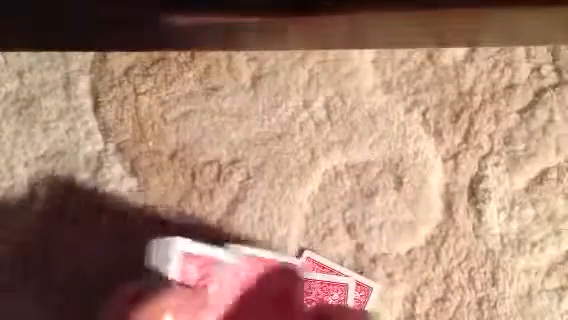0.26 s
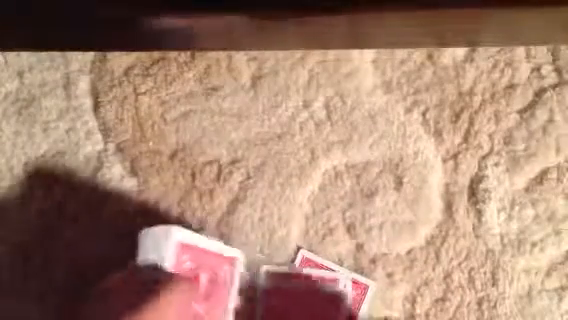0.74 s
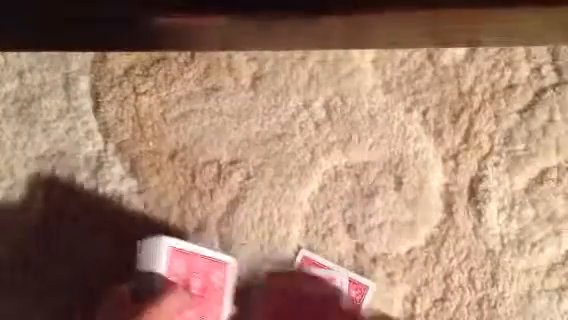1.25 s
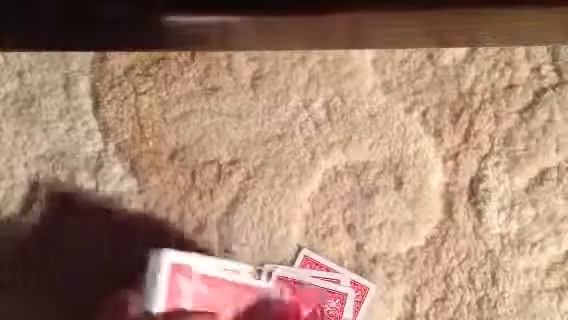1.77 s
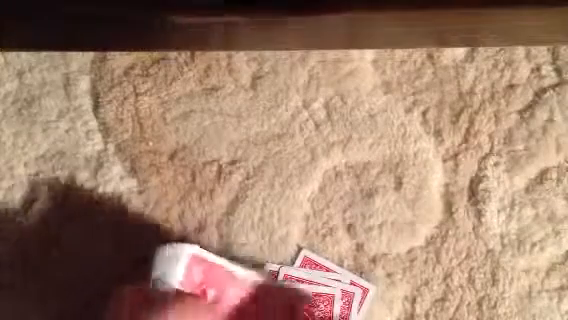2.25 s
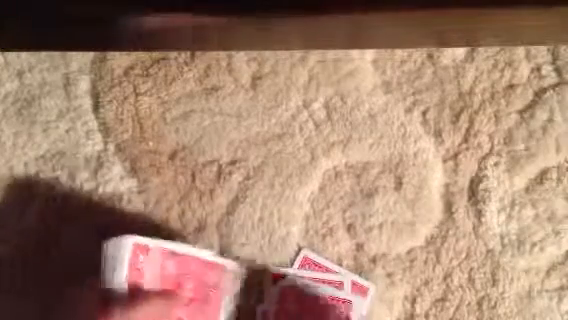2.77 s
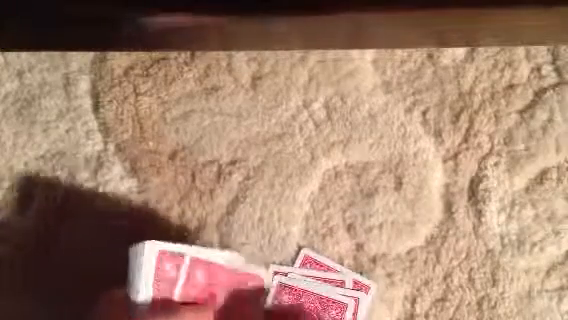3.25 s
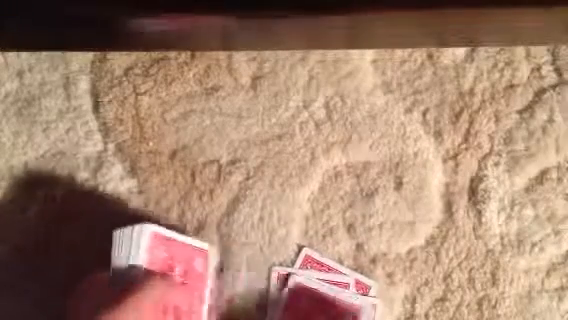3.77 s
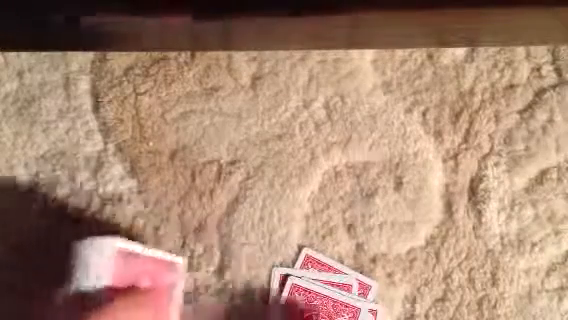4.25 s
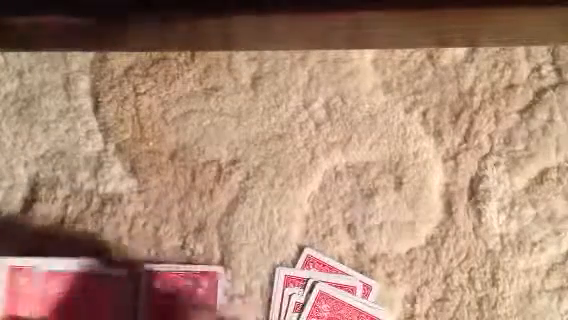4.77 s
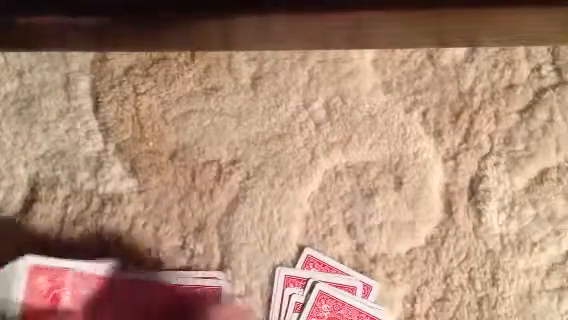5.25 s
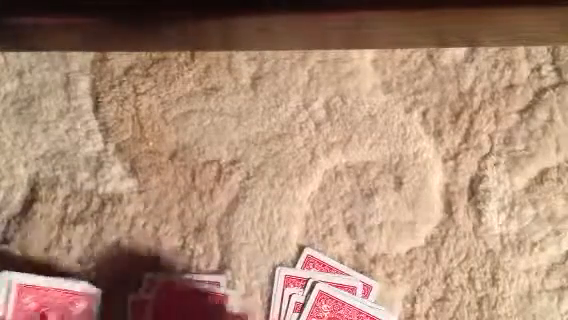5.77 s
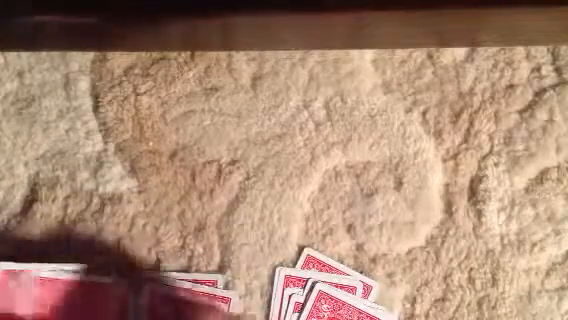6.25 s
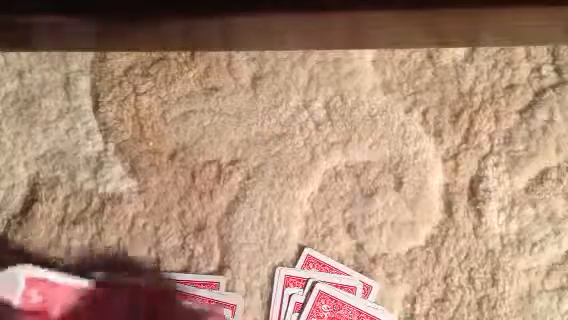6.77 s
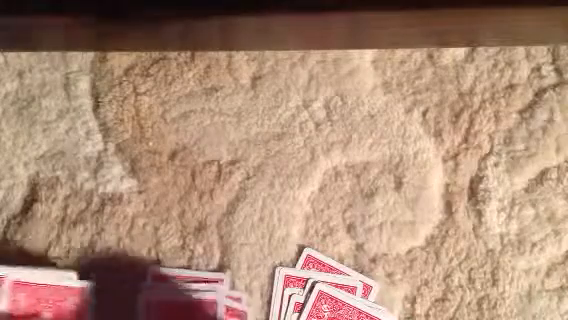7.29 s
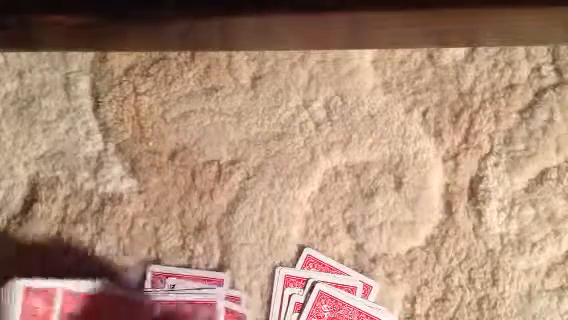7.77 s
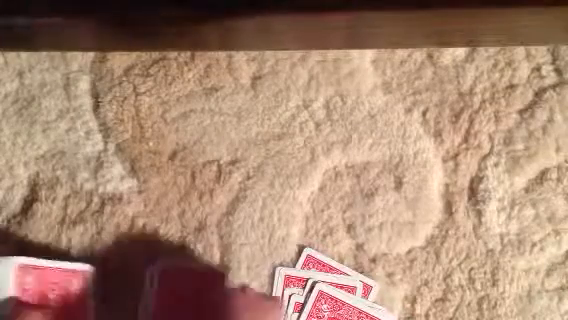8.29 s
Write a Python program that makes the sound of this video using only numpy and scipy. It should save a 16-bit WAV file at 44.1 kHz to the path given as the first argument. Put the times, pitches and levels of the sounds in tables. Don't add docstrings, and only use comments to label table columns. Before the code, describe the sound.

Playing cards dealt one by one from a hand-held deck, each a short papery scrape and crisp snap, in a small quiet room.

```python
import sys
import numpy as np
from scipy import signal
from scipy.fft import rfft, irfft, next_fast_len
from scipy.io import wavfile
from scipy.ndimage import uniform_filter1d, map_coordinates

SR = 44100
rng = np.random.default_rng(int(sys.argv[2]) if len(sys.argv) > 2 else 0)


def linear_from_db(decibels):
    return 10 ** (np.asarray(decibels, float) / 20)


def inscribe(sig):
    pcm = np.round(np.clip(np.atleast_2d(sig).T, -1, 1) * 32767)
    wavfile.write(sys.argv[1], SR, pcm.astype(np.int16))


N = 375732
SLOT, TAIL, LEAD = 2048, 20480, 64

# landing t/s, scrape level/dB, gap f/Hz, gap level/dB re scrape, thud level/dB
SLIDES = [(0.3638, -57, 1020, -9, -37.5), (0.7778, -54, 960, -13, -42), (1.297, -52, 1250, -19, -36.5),
          (1.6698, -47, 1280, -3.5, -38), (2.0085, -50, 1340, -2, -32), (2.3414, -51.5, 1240, 4, -39.5),
          (2.705, -47.5, 1250, -1, -42), (3.0716, -50.5, 970, -2.5, -37.5),
          (3.4183, -55.5, 1260, -9, -40.5), (3.788, -53.5, 635, -4, -39.5), (4.16, -48, 2380, -15, -40.5),
          (4.6506, -53.5, 2200, 0, -39.5), (4.9982, -50.5, 1700, -32, -32.5), (5.379, -54.5, 946, -24, -57),
          (5.76, -50.5, 650, -10, -35.5), (6.1526, -54, 2000, -1, -36), (6.4907, -51.5, 2280, -19, -35),
          (6.866, -51, 1570, -9, -50), (7.2218, -50, 1630, -7, -33.5), (7.5978, -49, 1550, -15, -31),
          (7.9726, -52, 2370, -1, -60), (8.322, -55.5, 2350, -13, -34)]
# t/s, level/dB, f/Hz
KNOCKS = [(0.413, -27.5, 685), (0.675, -35.5, 784), (0.753, -35, 643), (0.778, -18.5, 960),
          (0.931, -41, 328), (0.943, -45, 382), (0.973, -39, 360), (1.065, -39.5, 210), (1.075, -37, 395),
          (1.086, -57, 320), (1.201, -43, 660), (1.346, -29, 960), (1.922, -43, 680), (2.2605, -37.5, 640),
          (2.974, -40, 825), (3.317, -37.5, 417), (3.334, -46, 900), (3.469, -34.5, 394), (3.697, -40, 660),
          (4.212, -31, 780), (4.332, -45.5, 409), (4.91, -31, 725), (4.911, -42, 1270), (5.29, -49, 1400),
          (8.217, -38, 1340), (1.075, -36, 775), (6.0734, -49, 900), (4.939, -57, 304), (5.288, -38, 873),
          (6.403, -46, 890), (6.781, -44.5, 990), (6.904, -26, 687), (7.222, -25.5, 960), (7.291, -46, 370),
          (7.863, -44.5, 674), (8.2165, -38, 810)]


def unit(x):
    return x / np.sqrt(np.mean(x ** 2) + 1e-20)


def along(points, hz):
    f, v = np.transpose(points)
    return np.interp(np.log(hz + 1), np.log(f + 1), v)


def wobble(rate):
    knots = rng.standard_normal(int(N * rate / SR) + 4)
    return map_coordinates(knots, [np.arange(N) * rate / SR])


def resonance(f, hz, width_hz):
    return 1j * f * width_hz / (hz * hz - f * f + 1j * f * width_hz)


def rush(spectrum, patchy_db):
    z = signal.stft(rng.standard_normal(N), nperseg=256)[2]
    field = uniform_filter1d(rng.standard_normal(z.shape), size=4, axis=0)
    field = uniform_filter1d(field, size=8, axis=1)
    patchy = signal.istft(z * linear_from_db(patchy_db * unit(field)), nperseg=256)[1]
    m = next_fast_len(len(patchy))
    colour = linear_from_db(along(spectrum, np.fft.rfftfreq(m, 1 / SR)))
    return unit(irfft(rfft(patchy, m) * colour, m)[:N])


def slips(spectrum, patchy_db):
    unevenness = linear_from_db(3 * wobble(400) + 1.2 * wobble(60))
    return unit(unevenness * rush(spectrum, patchy_db))


def laid_out(rows, times):
    index = np.round(times * SR).astype(int)[:, None] - LEAD + np.arange(rows.shape[1])
    return np.bincount(index.ravel(), rows.ravel(), N + rows.shape[1])[:N]


def background():
    # f/Hz, level/dB
    hiss_spectrum = [(20, -25), (65, -22), (95, -12), (170, 1.5), (400, 0), (1400, -9), (3000, -10.5),
                     (5400, -14), (9000, -15), (15000, -18)]
    # f/Hz, rms level/dB
    hum = (119.8, -73)
    hum_hz, hum_db = hum
    phase = 2 * np.pi * np.cumsum(hum_hz + 0.94 * wobble(7.2)) / SR
    hiss = linear_from_db(-65) * rush(hiss_spectrum, patchy_db=.6)
    return hiss + linear_from_db(hum_db + 1.3 * wobble(4.3)) * np.sqrt(2) * np.sin(phase)


def rubbing():
    # f/Hz, level/dB per Hz
    palm = [(500, -39), (1200, 4), (2000, 6), (3000, 3), (4500, 3), (7000, -2.5), (12000, -16)]
    # f/Hz, level/dB per Hz
    rug_spectrum = [(90, -32.5), (180, 10), (350, 9.5), (700, 8), (1200, 3.5), (2500, -33)]
    # t/s, level/dB
    still = (0.18, -87)
    # t/s, level/dB
    hands = [(.36, -73), (.55, -79.5), (.95, -81), (1.301, -81), (1.55, -87.5), (2.2, -82.5), (2.55, -83.5),
             (2.85, -92), (3.301, -90.5), (4.2, -96), (4.45, -83), (4.9, -91), (5.6, -91), (6.401, -88),
             (6.7, -92), (7.4, -87.5), (8.25, -87), (8.45, -90)]
    scrape_db, rug_db = 19.5, 18
    settle_db, settle_s = -13, 0.062
    s, busy_db = np.transpose([still, *hands])
    t = np.arange(N) / SR
    rug = unit(linear_from_db(2.5 * wobble(60)) * rush(rug_spectrum, patchy_db=2.2))
    busy = linear_from_db(np.interp(t, s, busy_db) + 1.5 * wobble(5.4))
    settle = sum(linear_from_db(db + settle_db) * np.exp(-np.abs(t - at) / settle_s) for at, db, *_ in SLIDES)
    skin = linear_from_db(scrape_db) * busy * slips(palm, patchy_db=1.5)
    return skin + (linear_from_db(rug_db) * busy + settle) * rug


def burst(length, response, fall):
    spike = 3.7
    u = (np.arange(SLOT) - LEAD) / SR / length
    shape = np.clip(3 * u + .5, 0, 1) ** 3.3 * (u > 0) * linear_from_db(-fall * np.clip(u - .7, 0, None))
    first = np.arange(SLOT) == LEAD + np.round(0.4 * length * SR)
    grains = rng.standard_normal(u.shape) * linear_from_db(5.96 * rng.standard_normal(u.shape))
    force = rfft(shape * grains - spike * first)
    force = force / np.sqrt(np.abs(uniform_filter1d(np.abs(force) ** 2, size=36, axis=1)))
    rows = irfft(force * response(np.fft.rfftfreq(SLOT, 1 / SR)), SLOT)
    rows = rows * (np.arange(SLOT) < SLOT // 2)
    power = np.abs(uniform_filter1d(rows ** 2, size=60, axis=1))
    return rows / np.sqrt(power.max(axis=1, keepdims=True))


def contacts(table):
    # f/Hz, width/Hz, level/dB
    pile = [
        (345, 68, 3.5),
        (620, 104, 2),
        (1020, 600, -4),
    ]
    _, db, hz, pat_db, crack_db, ms = np.transpose(table)[:, :, None]
    length = ms / 1000

    def card(f):
        deck = 0.061 * resonance(f, 3890, 3900) ** 2 - 0.56 * resonance(f, 2308, 330)
        return resonance(f, hz, 0.12 * hz) + deck

    def edge(f):
        return resonance(f, 6750, 3100) * resonance(f, 3500, 7000) * resonance(f, 6000, 11000)

    def air(f):
        modes = sum((-1) ** k * linear_from_db(g) * resonance(f, c, w) for k, (c, w, g) in enumerate(pile))
        return modes * resonance(f, 550, 6900)

    ring = burst(length, card, fall=12.0)
    crack = burst(length, edge, fall=76)
    pat = burst(0.83 * length, air, fall=12.0)
    return linear_from_db(db - 5.5) * (ring + linear_from_db(crack_db - 4.0) * crack + linear_from_db(pat_db + 1.0) * pat)


def catches():
    # t/s, ring level/dB, ring f/Hz, crack level/dB re ring
    caught = [(0.2214, -47, 5500, 3), (4.9111, -46, 3050, -3), (2.4607, -46, 2400, -12),
              (2.4645, -43, 1640, -6), (2.4925, -39, 3700, -12), (2.498, -46, 3000, -10),
              (2.5604, -41, 4240, -22), (1.659, -38, 5600, -10), (8.217, -46, 4400, -2),
              (5.8065, -42, 3800, -15), (2.5645, -42, 4300, -3), (2.5695, -47, 4000, 0),
              (2.6215, -48, 5200, 0), (1.2215, -47, 2600, 0), (4.0506, -54, 4400, 0),
              (4.1079, -50, 4000, 0), (5.3207, -50, 4000, 0), (6.1134, -53, 3000, 0)]
    pat_db, ms = -11, 1.6
    return [(s, db, hz, pat_db, crack, ms) for s, db, hz, crack in caught]


def slides():
    # f/Hz, level/dB per Hz
    scrape_spectrum = [(500, -43.5), (1200, 2.5), (2500, 6.5), (4500, 7.5), (7000, 6), (11000, -2.5),
                       (16000, -71)]
    pushes = [66, 85, 56.4, 67, 62, 59.6, 80, 72, 75.7, 75, 64.6, 45, 52.5, 112, 64.5, 60.4, 58.3, 60, 45.6,
              47.7, 62, 72]
    lull, lull_s = 0.25, 0.008
    t = np.arange(N) / SR
    scrape = slips(scrape_spectrum, patchy_db=1.6)
    out = np.zeros(N)
    f = np.fft.rfftfreq(TAIL, 1 / SR)
    grit = unit(linear_from_db(4 * wobble(150)))
    for (s, db, hz, gap_db, thud_db), push_ms in zip(SLIDES, pushes):
        at = slice(round(s * SR) - TAIL // 2, min(N, round(s * SR) + TAIL // 2))
        u = t[at] - s
        push = np.sin(np.pi / 2 * np.clip(1.19 + 950 * u / push_ms, 0, 1)) ** 2.5
        speed = np.where(u < 0, push, np.exp(-u / 0.062))
        speed = speed * (1 - lull * np.exp(-(u / lull_s + 1) ** 2))
        cavity = resonance(f, hz, 0.54 * hz) * resonance(f, hz, 1500)
        gap = unit(irfft(rfft(rng.standard_normal(TAIL)) * cavity, TAIL))
        rubbed = scrape[at] + linear_from_db(gap_db - 2.0) * gap[:len(u)] * grit[at]
        late = np.clip(u - .003, 0, None) / 0.0051
        thud = late * np.exp(1 - late) * np.sin(2 * np.pi * rng.uniform(187.0, 209.4) * u)
        out[at] += linear_from_db(db) * speed * rubbed + linear_from_db(thud_db - 6.0) * thud
    return out


def corners():
    # t/s, ring level/dB, ring f/Hz, pat level/dB re ring, crack level/dB re ring
    touched = [(0.361, -30.5, 3170, 2.5, 9), (0.7772, -21, 6300, -14, -20), (1.293, -35.5, 3200, 4, 6),
               (1.671, -14.5, 4620, -14, -5), (2.0084, -22.5, 5070, -5.5, -23),
               (2.3406, -23, 4570, -4.5, -0.5), (2.7039, -23, 5000, -2, 4), (3.0705, -24.5, 4150, -7, -1.5),
               (3.4168, -32.5, 4300, -3.5, -7), (3.789, -40, 4400, 7, 11.5), (4.1601, -21.5, 3970, -7, -7),
               (4.6501, -36.5, 1670, 6.5, 4), (4.9934, -39.5, 6700, 0, 7), (5.3814, -29, 4840, -1.5, 2),
               (5.7567, -31.5, 2750, -7, -4), (6.1523, -22, 3060, -4.5, -6), (6.488, -35.5, 6220, 2, -4),
               (6.8662, -25.5, 5000, -1.5, 1), (7.223, -45, 7260, -9, 22), (7.597, -28, 5160, -7.5, 5.5),
               (7.9736, -30.5, 3170, -3, 13.5), (8.3218, -35.5, 4800, -9, 5)]
    return [(*row, 2.8) for row in touched]


def snaps():
    # t/s, ring level/dB, ring f/Hz, pat level/dB re ring, crack level/dB re ring
    landed = [(0.3665, -31.5, 2400, -1.5, -15), (0.7838, -17.5, 4230, -18, -30),
              (0.785, -19.5, 3130, -15.5, -25), (1.3043, -28.5, 3000, -6.5, 1.5),
              (1.2971, -35.5, 3200, 1, -3), (1.6762, -10.5, 4500, -25, -16), (1.678, -8.5, 2990, -35, 2.5),
              (1.6784, -14, 2530, -28, -4), (2.014, -20.5, 3130, -6, 8), (2.3494, -26.5, 2900, -6, 3),
              (2.7124, -17.5, 2550, -26, -20), (3.076, -23, 5540, -2, -37), (3.4247, -30, 2370, -2.5, 4),
              (3.7936, -30, 2450, -13, -7), (4.167, -24.5, 2430, -12.5, -10), (5, -28, 4900, -1.5, -38),
              (5.0043, -26, 2305, -4.5, -27), (5.0055, -27.5, 3820, -15, -20),
              (5.386, -21.5, 3900, -4, 3.5), (5.767, -25, 4660, -4.5, 1), (6.1583, -25.5, 2230, -0.5, 6),
              (6.494, -31, 4800, -12, -18.5), (6.8712, -15, 8250, -32, 5), (7.2253, -23.5, 5800, -5.5, -14),
              (7.2293, -17.5, 4880, -26, 2.5), (7.6006, -21, 4000, -27, -3), (7.605, -27, 2400, -15, -20),
              (7.9757, -23.5, 2325, -5.5, 2.5), (8.3277, -31, 2550, -8, -6)]
    return [(*row, 1.5) for row in landed]


def flaps():
    # t/s, ring level/dB, ring f/Hz, crack level/dB re ring
    flapped = [(0.412, -34, 5500, 9.5), (0.457, -38, 960, -20), (0.8167, -35.5, 2580, 2.5),
               (0.7729, -37, 6200, -10), (2.0464, -35, 5000, 0), (3.469, -42, 5200, 0),
               (0.8144, -34, 7000, 3), (1.3473, -29.5, 2370, 6.5), (1.6889, -30.5, 3140, -13),
               (2.0493, -27.5, 7160, 7.5), (2.376, -42.5, 7000, -1), (2.757, -32.5, 8000, 11),
               (3.107, -48.5, 1470, 17), (3.4331, -31.5, 2400, 6), (3.4455, -40.5, 2580, 12),
               (3.4722, -34.5, 5070, 5.5), (3.8347, -31, 5300, 3), (4.209, -40, 7500, 4),
               (4.2125, -34, 6400, 5), (4.177, -35.5, 3900, -8), (6.195, -36, 7000, 4),
               (5.4138, -30, 4450, 5), (6.1973, -31, 2270, 5), (6.5013, -31, 2520, -2),
               (6.5181, -37, 4750, 5), (6.5508, -40.5, 4800, 1.5), (6.8822, -27, 3550, -26),
               (7.2625, -36, 3580, -12), (7.6491, -33, 4600, -1), (7.9864, -30.5, 1830, -16),
               (8.006, -29.5, 4500, -16), (8.353, -43, 2500, -10), (8.3756, -39, 3280, -17),
               (8.379, -37.5, 4900, -2)]
    pat_db, ms = -2.5, 1.9
    return [(s, db, hz, pat_db, crack, ms) for s, db, hz, crack in flapped]


def knocks():
    decay_cycles, level_db = 1, -5.5
    _, db, hz = np.transpose(KNOCKS)[:, :, None]
    cycles = hz * np.clip(np.arange(SLOT) - LEAD, 0, None) / SR
    u = cycles / decay_cycles
    return linear_from_db(db + level_db) * u * np.exp(1 - u) * np.sin(2 * np.pi * cycles)


def taps():
    # t/s, ring level/dB, ring f/Hz, crack level/dB re ring
    tapped = [(0.669, -43.5, 4260, 1), (0.675, -51.5, 5370, 16.5), (0.929, -44.5, 3120, 4),
              (0.9419, -39.5, 4230, -11), (1.139, -43, 3630, 6), (1.1989, -38.5, 5100, -16),
              (1.521, -42.5, 3780, -48), (1.9165, -45, 4260, 1), (2.254, -49, 4250, 2),
              (2.9671, -51, 6300, 6), (3.3138, -42, 5930, -7), (3.694, -46, 4870, -8),
              (4.063, -42.5, 5030, 4), (5.2812, -44, 6050, -15), (5.346, -38.5, 4700, -8),
              (5.749, -58, 4700, 1), (6.038, -56, 5060, 10), (6.1325, -39, 2340, 3), (6.408, -56, 2280, 7),
              (6.766, -48.5, 4520, 5), (6.781, -51, 4330, -15.5), (6.848, -53, 1600, -16),
              (7.4883, -53, 6100, 1), (7.862, -51, 4930, 4), (7.946, -41.5, 5030, 9), (8.21, -55, 4750, -6)]
    pat_db, ms = -4, 3
    return [(s, db, hz, pat_db, crack, ms) for s, db, hz, crack in tapped]


def pats():
    # t/s, dull ring level/dB, pat level/dB re ring, crack level/dB re ring
    patted = [(0.7516, -43.5, 8, 4), (0.971, -56.5, 3, 17.5), (1.072, -56, 16.5, 13), (1.223, -63, 5, 18),
              (1.561, -49, 2.5, 3), (1.924, -63, 16, 13), (2.259, -65, 16, -8.5), (2.621, -58, 14, -13),
              (2.9754, -53, 10, 9), (3.282, -56, 6, 3), (3.334, -66, 10, -7), (3.6979, -58.5, 16, 13),
              (3.8471, -51.5, 15, 20.5), (4.029, -63, 10, 1), (4.331, -75, 14, -17), (4.89, -57, 12, -22.5),
              (4.9094, -55.5, 15, 12), (4.9372, -48.5, 3, -20), (5.0485, -54, 15, 11), (5.2896, -51, 12, 7),
              (5.658, -60, 10, 5), (5.725, -56.5, 11.5, -6), (6.402, -59, 10.5, 12), (1.079, -71, 19, -10),
              (6.905, -39.5, 4.5, -13), (7.102, -59, 2, 6.5), (7.29, -46.5, 13.5, 15), (8.174, -62, 2, 7),
              (8.215, -51.5, 11, 9), (0.6786, -64.5, 22.5, -10)]
    soft_hz, ms = 1570, 3.9
    return [(s, db, soft_hz, pat, crack, ms) for s, db, pat, crack in patted]


def glides(table, steady, width_hz):
    out = np.zeros(N)
    flutter = steady + wobble(width_hz) + 1j * wobble(width_hz)
    flutter = flutter / np.sqrt(np.mean(np.abs(flutter) ** 2))
    for s, ms, first_hz, last_hz, db in table:
        u = np.linspace(0, 1, round(ms * SR / 1000))
        at = slice(round(s * SR), round(s * SR) + len(u))
        phase = 2 * np.pi * np.cumsum(first_hz + (last_hz - first_hz) * u) / SR
        swell = np.abs(np.sin(np.pi * u)) ** 0.54
        out[at] += linear_from_db(db) * np.sqrt(2) * swell * np.real(flutter[at] * np.exp(1j * phase))
    return out


def squeaks():
    strokes = [(0.712, 37, 630, 1060, -49.5), (1.27, 22, 1140, 1250, -56), (1.63, 47, 910, 1200, -56),
               (1.975, 30, 1300, 1510, -56), (1.97, 20, 2870, 2970, -59), (2.315, 31, 1043, 1350, -54),
               (2.65, 48, 930, 1380, -50), (3.02, 19, 870, 955, -61), (3.39, 19, 1240, 1310, -60),
               (3.75, 30, 570, 650, -69), (4.838, 55, 612, 555, -60), (5.72, 33, 2180, 2380, -54.5),
               (6.804, 26, 610, 620, -61), (6.83, 12, 1280, 1370, -61), (6.842, 21, 1560, 1570, -50),
               (7.196, 30, 1470, 1590, -56), (7.568, 37, 1510, 1600, -55), (7.93, 30, 2200, 2300, -69)]
    return glides(strokes, steady=1.3, width_hz=330)


def ticks():
    # t/s, ring level/dB
    ticked = [(1.102, -50), (1.15, -42.5), (2.738, -54), (3.326, -53), (0.864, -61), (2.2, -58), (4.4, -60),
              (4.54, -69), (4.588, -52), (4.69, -78), (5.45, -41), (5.624, -62), (5.786, -40), (6.906, -48),
              (6.962, -56)]
    hz, pat_db, crack_db, ms = 4900, -8, 8, 0.66
    return [(s, db, hz, pat_db, crack_db, ms) for s, db in ticked]


def swishes():
    strokes = [(4.36, 120, 1300, 1600, -69), (4.70, 450, 2400, 2900, -67), (4.72, 117, 2600, 2900, -65.5),
               (4.33, 226, 450, 600, -62), (1.8, 90, 2500, 2400, -68), (2.46, 190, 3000, 2300, -60.5),
               (8.27, 70.5, 1400, 3800, -59.5), (8.222, 23, 900, 1100, -58), (2.8, 41, 1604, 1400, -52),
               (3.6, 16, 4020, 3900, -56), (4.04, 89.4, 560, 2000, -54), (6.075, 45, 340, 1600, -65),
               (8.215, 28, 1540, 740, -52)]
    return glides(strokes, steady=0, width_hz=1300)


def room(rows):
    # f/Hz, t60/s, level/dB
    decay = [(198, 0.3, 1.5), (685, 0.31, 0.5), (1700, 0.29, 5), (2400, 0.35, -1), (3000, 0.36, 2),
             (4000, 0.33, 2.5), (6650, 0.28, -5), (13000, 0.3, -12)]
    echo_db, echo_s = 4.5, 0.032
    beaming = 0.065
    bands = np.array(decay)
    hz, t, z = signal.stft(rng.standard_normal((len(rows), TAIL)), SR, nperseg=256)
    t60 = along(bands[:, [0, 1]], hz)[:, None]
    db = along(bands[:, [0, 2]], hz)[:, None]
    tails = signal.istft(z * linear_from_db(db - 60 * t / t60), SR, nperseg=256)[1][:, :TAIL]
    age = np.arange(TAIL) / SR
    tails = tails * (1 - np.exp(-age / 0.00029)) / np.linalg.norm(tails[0])
    lumps = unit(uniform_filter1d(rng.standard_normal(tails.shape), size=48, axis=1))
    tails = tails * linear_from_db(echo_db * lumps * np.exp(-age / echo_s))
    tails = tails * (np.abs(rows).max(axis=1, keepdims=True) / 0.043) ** -beaming
    power = uniform_filter1d(np.abs(rfft(rows, TAIL)) ** 2, size=100, axis=1)
    colour = np.sqrt(np.abs(0.85 * power + 0.27 * uniform_filter1d(power, size=1600, axis=1)))
    return irfft(rfft(tails) * colour, TAIL) * (np.arange(TAIL) < TAIL - SLOT)


def scene():
    table = catches() + corners() + snaps() + flaps() + taps() + pats() + ticks()
    rows = np.concatenate([contacts(table), knocks()])
    times = np.concatenate([np.transpose(table)[0], np.transpose(KNOCKS)[0]])
    cards = laid_out(rows, times) + linear_from_db(-8.5) * laid_out(room(rows), times)
    return (cards + slides() + squeaks() + swishes() + rubbing())[None]


def band_limit(x):
    return signal.sosfilt(signal.butter(12, 16500, fs=SR, output="sos"), x)


def record(dry):
    rounded = dry / (1 + np.abs(dry / .68) ** 4) ** (1 / 4)
    bass_cut = signal.butter(3, 118, "high", fs=SR, output="sos")
    top_cut = signal.cheby2(12, 32, 15500, fs=SR, output="sos")
    mix = signal.sosfilt(bass_cut, rounded) + background()
    mix = signal.sosfilt(top_cut, mix)
    return band_limit(mix)


dry = scene()
out = record(dry)
inscribe(out)
```